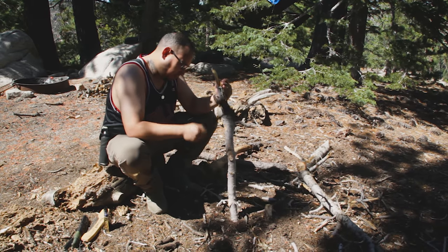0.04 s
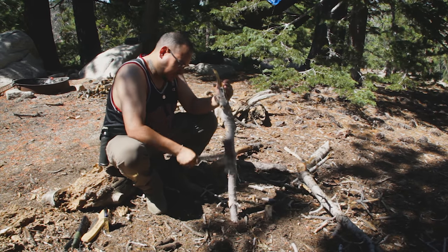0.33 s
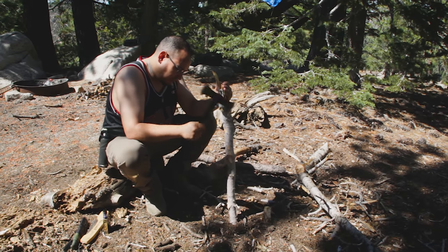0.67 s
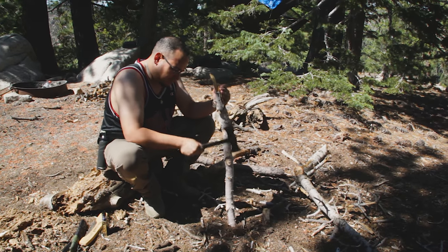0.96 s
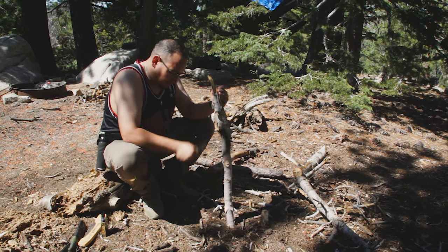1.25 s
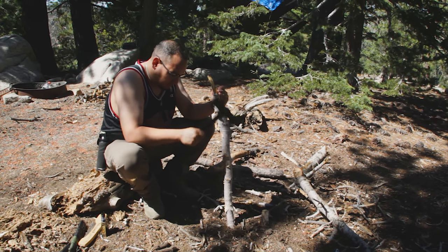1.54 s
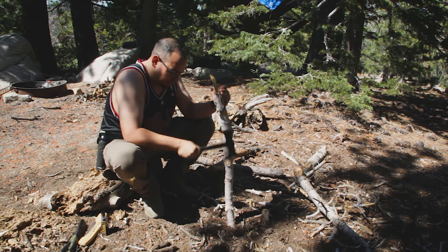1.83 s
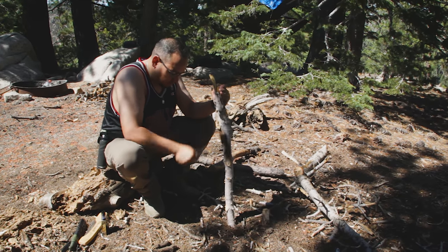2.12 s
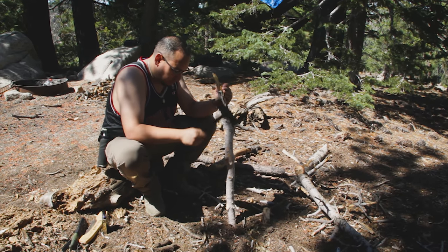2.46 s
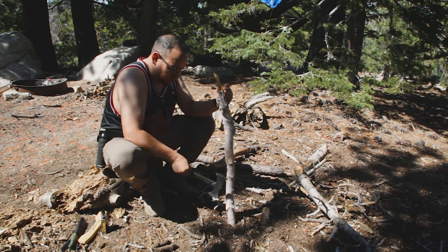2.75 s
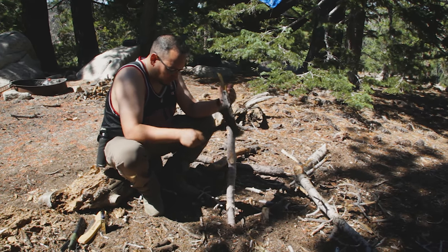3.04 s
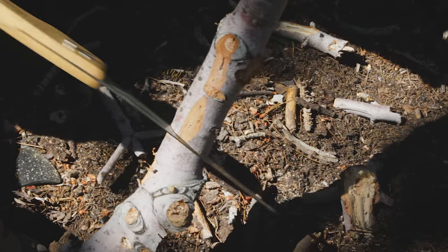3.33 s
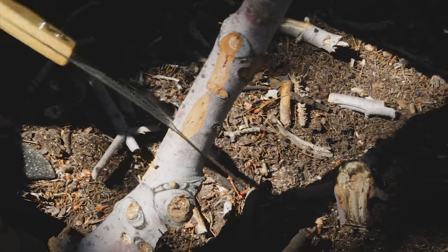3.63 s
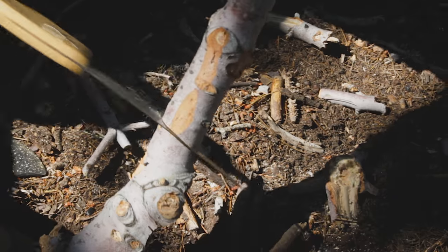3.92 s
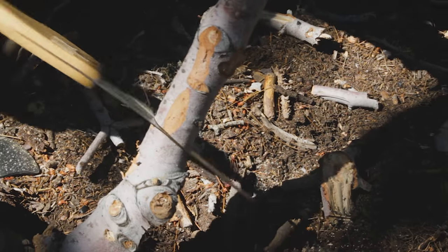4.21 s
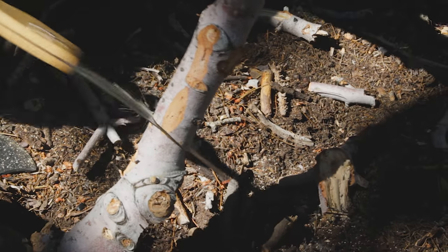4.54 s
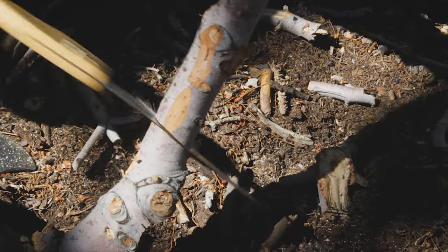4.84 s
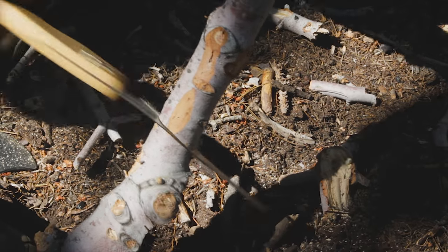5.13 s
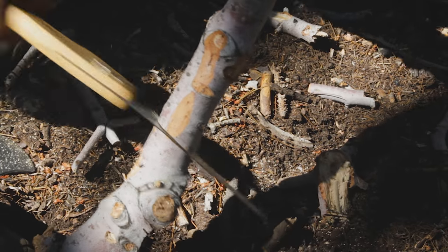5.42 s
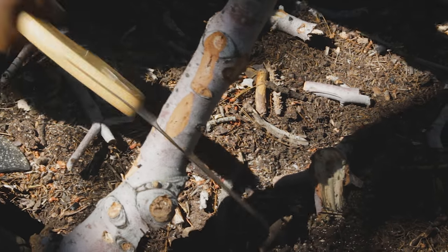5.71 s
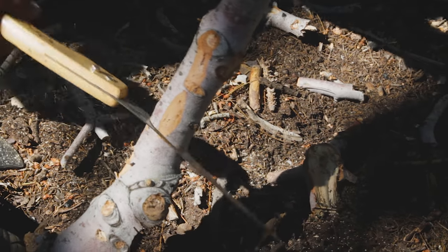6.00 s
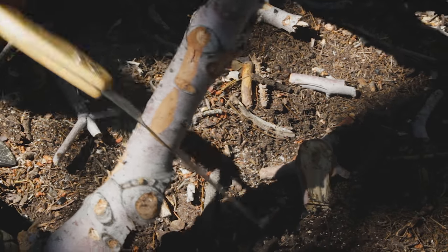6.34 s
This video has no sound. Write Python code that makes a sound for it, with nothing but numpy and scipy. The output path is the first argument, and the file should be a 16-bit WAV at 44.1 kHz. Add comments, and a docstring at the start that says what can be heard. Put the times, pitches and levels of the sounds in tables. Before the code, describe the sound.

Six evenly paced hatchet blows drive a wooden stake into the soil, each a dry knock with a light metallic ring. Right after, close up, a hand saw rasps rapidly back and forth through a branch. Its thin blade rings and squeaks when pinched, and the handle knocks the wood a few times. A faint hush of treetops lies underneath, with soft puffs of wind on the microphone during the sawing.

```python
"""A hatchet knocks six times on a wooden stake in a quiet forest: each impact excites the damped modes of
the stake and the long ring of the steel head, and the trees scatter the sound back. Then a pull saw cuts
a branch close by: its teeth tear fibres and drive the blade's resonances, louder on the pull than on the
push. Stick-slip friction makes the blade squeal, the handle bumps the branch after some pushes,
and a little air buffets the microphone."""
import sys
import numpy as np
from scipy import signal
from scipy.fft import rfft, irfft, next_fast_len
from scipy.io import wavfile
from scipy.ndimage import uniform_filter1d, map_coordinates

SR = 44100
rng = np.random.default_rng(int(sys.argv[2]) if len(sys.argv) > 2 else 0)


def to_wav(sig):
    """Store sig (one row per channel, or 1-D mono) as 16-bit WAV at the path in sys.argv[1].

    Samples outside -1..1 are clipped; the rate is SR.
    """
    pcm = np.clip(np.atleast_2d(sig), -1, 1) * 32767
    pcm = np.round(pcm).astype(np.int16)
    wavfile.write(sys.argv[1], SR, pcm.T)  # frames by channels


N = 280917
TIME = np.arange(N) / SR
AGE = TIME[:SR]  # seconds since an impact
TOP_HZ = 15400

# blows that drive the stake into the soil: start_s, level_db
SOIL_BLOWS = [(0.415, -34.5), (0.932, -30.5), (1.385, -28.5), (1.831, -38), (2.251, -31.5)]
# saw strokes: start_s, length_s, rasp_db, lean_db, ring_db, ring_place (0-1), wood_db
# lean is the change in level from start to end as the hand's pressure changes
PULL_STROKES = [(3.274, 0.062, -32.5, -17, -26.5, 0.2, -32), (3.607, .122, -23.5, 10.5, -16.5, 0.68, -27),
                (3.934, 0.15, -26.5, 0, -12.5, 0.53, -27), (4.246, 0.17, -23, -1.5, -11.5, 0.37, -25.5),
                (4.564, 0.16, -22.5, 1, -12, 0.45, -24.5), (4.873, .182, -22, -4, -12.5, 0.44, -24.5),
                (5.184, .164, -25.5, 1.5, -11, 0.45, -27), (5.489, 0.19, -21, -2.5, -11.5, 0.42, -25),
                (5.798, 0.15, -22, 2.5, -11.5, 0.45, -24.5), (6.116, 0.13, -26.5, 9.5, -16.5, 0.34, -26)]
PUSH_STROKES = [(3.385, .16, -33, 23, -23, 0.88, -33.5), (3.748, .14, -29, 17.5, -19, 0.66, -28.5),
                (4.074, .158, -30, -3, -22, 0.63, -27), (4.405, 0.12, -27.5, -6, -17, 0.67, -23),
                (4.714, 0.13, -28.5, 3.5, -19.5, 0.62, -25.5), (5.022, .125, -28.5, 5, -14.5, 0.63, -26.5),
                (5.327, .117, -32.5, 14, -20, 0.66, -29), (5.662, 0.087, -32, 2, -19.5, 0.58, -27.5),
                (5.94, 0.12, -35.5, 6, -23.5, 0.7, -31.5), (6.251, 0.12, -32.5, 6, -24, .71, -28.5)]
# the kerf pinches the blade: middle_s, half_length_s, squeal_db, slip_rate_hz, rasp_rise_db
PINCHES = [(4.692, 0.0045, -37, 560, 8), (5.003, .008, -19, 556, 11.5), (5.305, 0.015, -26, 485.8, 14.5),
           (5.609, 0.01, -20.5, 588, 11.5), (5.918, 0.0081, -9.5, 563, 11.5),
           (6.217, 0.012, -13.5, 560.5, 12)]
# spectrum of teeth skidding on the push: frequency_hz, level_db
SKID_SPECTRUM = [(2300, -33), (3300, -3), (4400, 1.5), (5000, 1), (5900, 1), (7200, -10), (8800, -4.5),
                 (11000, -7.5), (12500, -13.5), (14800, -33.5), (15800, -41.5)]
# spectrum of the scraped branch: frequency_hz, level_db
WOOD_SPECTRUM = [(50, -9), (130, -16.5), (310, 6), (420, -2.5), (600, 1.5), (760, 5.5), (1100, 1.5),
                 (1550, 8), (1800, 4.5), (2100, 8.5), (2450, 2), (3200, 5.5), (6000, -37)]


def undb(db):
    """Decibels to amplitude ratio."""
    return 10 ** (np.asarray(db) / 20)


def unit(x):
    """Normalise to rms 1."""
    return x / np.sqrt(np.mean(x ** 2))


def fade(t60):
    """Exponential decay, 60 dB in t60 seconds."""
    return np.exp(-np.log(1000) * AGE / max(t60, 1e-3))


def swell(middle_s, half_s):
    """Gaussian envelope; peak 1."""
    return np.exp(-((TIME - middle_s) / half_s) ** 2)


def linger(gain, release_s):
    """First-order lag: a level builds up and dies away exponentially."""
    keep = np.exp(-1 / (SR * max(release_s, 1e-3)))
    return signal.lfilter([1 - keep], [1, -keep], gain)


def add(out, start_s, sound):
    """Superpose a sound from a given time."""
    i = max(int(start_s * SR), 0)
    out[i:i + len(sound)] += sound[:max(N - i, 0)]


def shape(x, response):
    """Filter by a frequency response."""
    size = next_fast_len(len(x) + 4096)
    hz = np.maximum(np.arange(size // 2 + 1) * SR / size, 1)
    return irfft(rfft(x, size) * response(hz), size)[:len(x)]


def colour(x, spectrum):
    """Impose a spectral envelope of (frequency_hz, level_db) points; rms 1."""
    hz, db = np.transpose(spectrum)
    return unit(shape(x, lambda f: undb(np.interp(np.log(f), np.log(np.sort(hz)), db))))


def resonate(x, hz, width_hz):
    """Two equal resonators in cascade; rms 1."""
    return unit(shape(x, lambda f: (1 + 1j * (f / hz - hz / f) * hz / width_hz) ** -2))


def walk(rate_hz):
    """Smooth random modulation; rms 1."""
    hold = max(int(SR / rate_hz), 2)
    steps = rng.standard_normal(4096)
    return unit(uniform_filter1d(steps[np.arange(N) // hold % len(steps)], hold))


def knock(modes):
    """Impact response: a sum of damped modes of alternating sign; peak 1."""
    ring = sum((-1) ** k * undb(db) * fade(t60) * np.cos(2 * np.pi * hz * AGE)
               for k, (hz, t60, db) in enumerate(modes))
    ring = shape(ring, lambda f: (1 + 1j * f / modes[-1][0] / 2) ** -2)  # the contact acts as a low-pass
    return ring / np.abs(ring).max()


def clicks(rate_hz, spread_db):
    """Shot noise: random impulses of uneven size; rms 1."""
    hits = rng.random(N) < rate_hz / SR
    return unit(hits * rng.standard_normal(N) * undb(spread_db * rng.standard_normal(N)))


def swing(start_s, length_s):
    """Half a cycle of harmonic motion of the arm, rest to rest: progress and speed, both 0-1."""
    progress = np.clip((TIME - start_s) / length_s, 0, 1)
    return progress, np.sin(np.pi * progress) * (progress < 1)


def air(hush_db=-56.5, flutter_db=4.0, draught_db=-49):
    """Turbulence: a steady hush in the treetops, and eddies on the microphone from breeze and arm."""
    # spectra of the treetops and of the buffeting: frequency_hz, level_db
    treetops = [(15, -45), (25, -16), (56, -13), (120, -18), (200, -11.5), (276, -11), (437, -8),
                (710, -5.5), (1010, -4.5), (1980, -13), (2150, -11), (6310, -20.5), (15800, -34)]
    buffeting = [(20, -13), (60, 8.5), (100, 7.5), (200, 13), (350, -1), (700, -31), (2000, -70)]
    # slow swells of the breeze: middle_s, half_length_s, level_db
    gusts = [(4.25, 0.21, -34), (4.75, 0.21, -44), (5.83, 0.035, -45), (6.204, 0.055, -33),
             (6.353, 0.059, -33)]
    hush = colour(rng.standard_normal(N), treetops) * undb(hush_db)
    eddies = unit(colour(rng.standard_normal(N), buffeting) * undb(flutter_db * walk(35)))
    breeze = sum(undb(db) * swell(middle_s, half_s) for middle_s, half_s, db in gusts)
    arm_speed = sum(swing(start_s, length_s)[1] for start_s, length_s, *_ in PULL_STROKES + PUSH_STROKES)
    draught = undb(draught_db) * linger(arm_speed, release_s=0.05)
    return hush + eddies * np.hypot(breeze, draught)


def steel_head(facing_s=0.096, facing_spread=.55, edge_on_db=-18, waver_db=2.3, contact_db=8):
    """Free vibration of the hatchet head; directivity and Doppler shift make it waver as it swings."""
    # modes of the steel: pitch_hz, t60_s
    modes = [(1534, 1.5), (2820, 1.24), (6840, 0.19), (9010, 0.33), (10300, .14), (10680, 0.16)]
    # onsets of ringing: start_s, then level_db of each mode
    onsets = [(0.0, -74, -64, -71, -52, -82.5, -83.5), (0.406, -38, -40, -37, -28.5, -43.5, -25),
              (0.923, -70, -70.5, -50.5, -37.5, -42, -47.5), (1.374, -76, -34.5, -37, -41.5, -44, -38),
              (1.824, -70, -70, -47, -58, -44.5, -52), (2.24, -35, -47, -37, -26, -37, -39),
              (2.751, -23.5, -33, -55, -30, -57, -28)]
    out = np.zeros(N)
    # the lowest mode beams from the cheek, so it is loud only while the cheek faces the microphone
    facing = undb(edge_on_db) + np.exp(-(np.log(AGE / facing_s + 1e-9) / facing_spread) ** 2)
    contact = undb(contact_db) * fade(t60=0.069)  # fast early decay while the wood damps the steel
    for k, (hz, t60) in enumerate(modes):
        ring = np.zeros(N)
        for start_s, *levels_db in onsets:
            ring[int(start_s * SR):] = 0  # a new contact stops the old ring
            envelope = fade(t60) * (facing if k == 0 else 1 + (start_s > 0) * contact)
            doppler_time = np.cumsum(1 + .001 * walk(25)[:SR] + .0015 * walk(200)[:SR]) / SR
            add(ring, start_s, undb(levels_db[k]) * envelope * np.sin(2 * np.pi * hz * doppler_time))
        waver = walk(hz / 120) + walk(hz / 60)  # shorter waves sweep past the microphone faster
        out += ring * undb(waver_db * waver * (k > 0))
    return out


def ticks():
    """Band-limited transients: twigs, grit and the snagging blade give short snaps of noise."""
    # snaps: start_s, level_db, t60_s, centre_hz, width_hz
    snaps = [(0.128, -56, .05, 8900, 5000), (0.155, -58, .03, 11000, 3970),
             (0.572, -49.5, 0.13, 9700, 5000), (0.680, -45.5, 0.033, 7500, 5140),
             (3.1312, -37.5, 0.018, 4230, 4020), (3.1557, -55, 0.038, 9800, 5940),
             (3.598, -38, 0.096, 3470, 4000), (3.9285, -27, 0.032, 5300, 6850),
             (4.4268, -18, 0.075, 4250, 4800), (4.585, -23.5, 0.05, 3510, 4000),
             (5.17, -12.5, 0.008, 3150, 6160), (5.948, -19, 0.061, 3680, 2500),
             (6.0439, -10.5, 0.016, 2950, 6200), (6.041, -14.5, 0.029, 1980, 200),
             (6.127, -24, 0.019, 3180, 3000)]
    out = np.zeros(N)
    for start_s, db, t60, hz, width_hz in snaps:
        add(out, start_s, undb(db) * fade(t60) * resonate(rng.standard_normal(SR), hz, width_hz))
    return out


def stake(body_db=5, main_hz=900):
    """Impact excitation: a contact cracks fibres and rings the stake at a pitch set by its angle."""
    # hatchet on stake: start_s, knock_db, pitch_hz, crack_db, crack_t60_s, crack_low_hz, crack_high_hz
    contacts = [(0.402, -6.5, 922, 0.5, 0.0049, 1000, 12000), (0.4055, -20, 850, -0.5, 0.017, 2000, 12000),
                (0.4629, -29, 900, -30, 0.043, 200, 11100), (0.9231, -7.5, 902, 1.5, 0.014, 3240, 6000),
                (1.3700, -9.5, 864, -13, 0.014, 1500, 10870), (1.3766, -12.5, 900, -3.5, 0.024, 1210, 7540),
                (1.8211, -5.5, 845, -4, 0.02, 2200, 4870), (1.823, -30, 880, -3, 0.015, 2580, 7440),
                (2.2356, -12, 839, -16, 0.014, 598, 3000), (2.241, -13, 935, -6, 0.028, 1300, 6750),
                (2.2935, -42.5, 900, -31.5, 0.025, 1200, 3480), (2.7514, -7, 905, -7.5, 0.02, 595, 4850),
                (2.7672, -19.5, 900, -15, 0.033, 900, 2480), (2.7727, -13, 900, -10.5, 0.041, 900, 2350)]
    # modes of the stake, the strongest at main_hz: pitch_hz, t60_s, level_db
    modes = [(194, 0.053, -21.5), (290, 0.034, -11.5), (437, 0.017, -6), (772, 0.009, 3.5),
             (900, 0.018, 5.5), (1084, 0.024, -6), (1590, .016, -22), (2170, 0.027, -9.5),
             (2860, 0.027, -10)]
    # spectrum of cracking fibres: frequency_hz, level_db
    crack_spectrum = [(200, -29.5), (1200, 3.5), (2400, 5.5), (3300, 0.5), (5400, -3.5), (6200, -2.5),
                      (6850, 9.5), (7600, -1.5), (9500, -4), (10600, 0), (12000, -13.5), (16000, -11)]
    out = np.zeros(N)
    for start_s, knock_db, pitch_hz, crack_db, crack_t60, low_hz, high_hz in contacts:
        body = knock([(hz * pitch_hz / main_hz, t60, db) for hz, t60, db in modes])
        crack = colour(rng.standard_normal(SR), crack_spectrum)
        # each contact's crack has its own band, from low_hz to high_hz
        crack = unit(shape(crack, lambda f: 1 / np.sqrt(1 + (f / high_hz) ** 4 + (low_hz / f) ** 4)))
        add(out, start_s, undb(body_db + knock_db) * body + undb(crack_db) * fade(crack_t60) * crack)
    return out


def trees(x, wet_db, build_s=0.023, t60=0.31, early_db=-17, early_t60=0.14):
    """Scattering from trunks: a diffuse cloud of echoes with a faint, faster-decaying part."""
    # spectrum of the echoes: frequency_hz, level_db
    echo_spectrum = [(80, -6), (400, -5.5), (900, -6), (2800, -1), (5500, -5.5), (8000, -31.5), (15000, 2)]
    cloud = colour(rng.standard_normal(SR), echo_spectrum) * (fade(t60) + undb(early_db) * fade(early_t60))
    cloud *= np.minimum(AGE / build_s, 1) ** 2
    return undb(wet_db) * signal.fftconvolve(x, cloud / np.sqrt(np.sum(cloud ** 2)))[:N]


def soil_thuds(attack_s=.004):
    """Heavily damped vibration of the soil as the stake is driven in."""
    # modes of the soil around the foot: pitch_hz, t60_s, level_db
    modes = [(81.2, 0.04, 0.5), (150, 0.018, 10), (213, 0.098, -3)]
    out, body = np.zeros(N), knock(modes)
    for start_s, db in SOIL_BLOWS:
        add(out, start_s, undb(db) * body * np.minimum(AGE / attack_s, 1))
    return out


def crumbs(sawdust_db=-52, sawing_from_s=3.35, sawing_to_s=6.37, bark_db=-41, bark_t60=0.12):
    """Shot noise of tiny impacts: bark scatters after each thud, and sawdust patters under the saw."""
    amount = undb(sawdust_db) * ((TIME > sawing_from_s) & (TIME < sawing_to_s))
    for start_s, _ in SOIL_BLOWS:
        add(amount, start_s, undb(bark_db) * fade(bark_t60))
    return amount * colour(clicks(rate_hz=900, spread_db=4), SKID_SPECTRUM)


def handle_bumps(body_db=3, scuff_db=-17, scuff_t60=0.037):
    """Impact and friction: the saw's handle excites the modes of the branch and scuffs its bark."""
    # handle on branch: start_s, level_db
    bumps = [(3.13, -38), (3.5265, -6.5), (3.8709, -5), (4.83, -12.5), (6.043, -32)]
    # modes of the branch: pitch_hz, t60_s, level_db
    modes = [(216, 0.065, -16), (429, 0.033, -9.5), (621, 0.028, 4), (746, 0.018, 6.5), (1166, 0.014, 3),
             (1650, 0.0077, 6.5)]
    out, body = np.zeros(N), knock(modes)
    for start_s, db in bumps:
        scuff = colour(rng.standard_normal(SR), WOOD_SPECTRUM) * fade(scuff_t60)
        add(out, start_s, undb(db) * (undb(body_db) * body + undb(scuff_db) * scuff))
    return out


def pings(rate_hz, t60, spread_db, samples=400):
    """Free vibration of single teeth and splinters, each flicked into a brief ring at its own pitch."""
    out, age = np.zeros(N), AGE[:samples]
    start, pitch, size, phase = rng.random((int(rate_hz * N / SR), 4)).T[:, :, None]
    envelopes = undb(-spread_db * np.log(1 - .95 * size)) * fade(t60)[:samples]
    grains = envelopes * np.sin(2 * np.pi * (pitch * TOP_HZ * age + phase))
    np.add.at(out, (start * (N - samples)).astype(int) + np.arange(samples), grains)
    return unit(out)


def drive(strokes, rasp_power, wood_power, wood_lean_db, ring_width, off_ring_db):
    """Power laws of stroke speed set the gains of rasp, blade and wood; returned with the progress."""
    rasp, blade, wood, place = np.zeros((4, N))
    pinch_db = sum(rise_db * swell(middle_s, half_s=0.011) for middle_s, *_, rise_db in PINCHES)
    # just after a pinch the teeth skid, and the branch shakes less
    skid_db = -7.5 * sum(swell(middle_s + 0.021, half_s=0.019) for middle_s, *_ in PINCHES)
    for start_s, length_s, rasp_db, lean_db, ring_db, ring_place, wood_db in strokes:
        progress, speed = swing(start_s, length_s)
        on = speed > 0
        place[on], speed, along = progress[on], speed[on], progress[on] - .5
        # the blade rings most at one place along its length
        off_ring = 1 - np.exp(-((place[on] - ring_place) / ring_width) ** 2)
        rasp[on] = speed ** rasp_power * undb(rasp_db + lean_db * along + pinch_db[on])
        blade[on] = speed ** rasp_power * undb(ring_db + off_ring_db * off_ring + 0.27 * pinch_db[on])
        wood[on] = speed ** wood_power * undb(wood_db + (lean_db + wood_lean_db) * along + skid_db[on])
    shake = undb(-17.5) * linger(wood, release_s=0.087)  # the branch shakes on after a stroke
    return rasp, blade, np.hypot(wood, shake), place


def saw(motion, rasp_spectrum, rasp_db, blade_db, wood_db, chatter_db, chatter_hz, glide, tooth_hz):
    """Forced vibration: teeth snapping fibres hiss, ring the thin blade and shake the branch."""
    # resonances of the blade: centre_hz, width_hz, level_db
    resonances = [(2825, 185, 1.5), (3000, 188, 9.5), (3140, 93, -32)]
    rasp_gain, blade_gain, wood_gain, progress = motion
    travel, speed = -np.cos(np.pi * progress), np.sin(np.pi * progress)
    # the blade sticks and slips in the kerf, so the teeth catch in bunches
    chatter = undb(chatter_db * walk(chatter_hz))
    teeth = clicks(rate_hz=4000, spread_db=-0.5) * chatter
    grit = teeth + pings(rate_hz=2400, t60=.025, spread_db=2.5) * chatter
    blade = unit(sum(undb(db) * resonate(np.roll(teeth, 40 * k), hz, width_hz)
                     for k, (hz, width_hz, db) in enumerate(resonances)))
    # the free length of the blade changes along the stroke, and its pitch with it
    pitch_ratio = 1 + glide * travel + .012 * walk(40)
    blade = map_coordinates(blade, [np.cumsum(pitch_ratio)], order=3, mode="mirror")
    # evenly spaced teeth bump over the edge of the kerf: a buzz whose pitch follows the speed
    teeth_passed = np.floor(np.cumsum(tooth_hz * speed * (1 + .06 * walk(600))) / SR)
    buzz = unit(np.diff(teeth_passed, prepend=0) * chatter)
    buzz -= uniform_filter1d(buzz, size=200)
    wood = colour(grit + teeth, WOOD_SPECTRUM) + .3 * colour(buzz, WOOD_SPECTRUM)
    return (undb(rasp_db) * rasp_gain * colour(grit, rasp_spectrum)
            + undb(blade_db) * blade_gain * blade
            + undb(wood_db) * wood_gain * wood)


def branch_groans(jitter=.035, octave_db=-6):
    """Contact chatter: the branch bounces on the teeth at an unsteady rate, giving a short low tone."""
    # judders: middle_s, half_length_s, level_db, rate_hz
    judders = [(3.496, 0.012, -30.5, 290), (4.023, 0.015, -38, 320), (4.786, 0.027, -29, 208),
               (5.089, 0.027, -40.5, 210), (5.722, 0.016, -31.5, 222), (5.9, 0.009, -31.5, 330),
               (6.347, .012, -24.5, 305)]
    out, wobble = np.zeros(N), 1 + jitter * walk(150)
    for middle_s, half_s, db, hz in judders:
        phase = 2 * np.pi * hz * np.cumsum(wobble) / SR
        out += undb(db) * swell(middle_s, half_s) * (np.sin(phase) + undb(octave_db) * np.sin(2 * phase))
    return out


def air_puffs(half_s=0.0063, lead_s=.05):
    """Pressure fluctuation: a brief eddy gives the microphone a cycle or two of low frequency."""
    # single eddies: middle_s, level_db, centre_hz
    eddies = [(4.099, -30, 109), (4.274, -29, 120.7), (4.591, -28, 97), (4.711, -33, 169),
              (4.866, -29.5, 105), (5.246, -30, 104), (5.385, -26, 109.7), (5.405, -28, 90),
              (5.72, -43, 150)]
    out, centred = np.zeros(N), AGE - lead_s
    envelope = np.exp(-(centred / half_s) ** 2)
    for middle_s, db, hz in eddies:
        add(out, middle_s - lead_s, undb(db) * envelope * np.sin(2 * np.pi * hz * centred))
    return out


def blade_squeals(jitter=0.051, slowing=.05):
    """Stick-slip oscillation: where the kerf pinches the blade, the slips lock into a falling buzz."""
    # spectrum of the squeal: frequency_hz, level_db
    squeal_spectrum = [(500, -50), (2200, 4), (2800, 21.5), (3800, 15.5), (5000, 5), (6000, 0), (7500, -40),
                       (14000, -42)]
    out = np.zeros(N)
    for middle_s, half_s, db, hz, _ in PINCHES:
        offset = np.clip(AGE / half_s - 3, -3, 3)  # half lengths from the middle
        cycles = np.cumsum(hz * (1 - slowing * offset + jitter * walk(900)[:SR])) / SR
        slips = colour(np.diff(np.floor(cycles), prepend=0), squeal_spectrum)
        add(out, middle_s - 3 * half_s, undb(db) * np.exp(-offset ** 2) * slips)
    return out


def blade_twang():
    """Elastic recoil: a short note rises as the bent blade springs straight after the last pinch."""
    # recoil: middle_s, half_length_s, level_db, final_pitch_hz, settle_s
    recoils = [(6.232, .016, -29.5, 789.5, 0.01387)]
    out = np.zeros(N)
    for middle_s, half_s, db, hz, settle_s in recoils:
        age = np.maximum(TIME - middle_s + 2 * half_s, 0)
        pitch_hz = hz * (1 - np.exp(-age / settle_s))
        out += undb(db) * swell(middle_s, half_s) * np.sin(2 * np.pi * np.cumsum(pitch_hz) / SR)
    return out


def scene():
    """Superposition: hatchet, then saw, both echoed by the trees, over falling crumbs and moving air."""
    # spectrum of teeth tearing fibres on the pull: frequency_hz, level_db
    tear_spectrum = [(2300, -21.5), (3300, -11), (3800, 5), (4400, 0), (4950, 1.5), (5900, 1), (6500, -5),
                     (6900, -3), (7300, -10.5), (8800, -3.5), (10500, -8.5), (12500, -12.5), (14800, -30),
                     (15800, -39)]
    hatchet = stake() + soil_thuds() + steel_head()
    pulling = drive(PULL_STROKES, rasp_power=1.28, wood_power=1.06, wood_lean_db=4.0,
                    ring_width=0.14, off_ring_db=-9.5)
    pushing = drive(PUSH_STROKES, rasp_power=1.0, wood_power=0.68, wood_lean_db=6,
                    ring_width=0.19, off_ring_db=-16.5)
    pulls = saw(pulling, tear_spectrum, rasp_db=-0.9, blade_db=0.06, wood_db=-1.74,
                chatter_db=1.8, chatter_hz=200, glide=-0.0296, tooth_hz=731.0)
    pushes = saw(pushing, SKID_SPECTRUM, rasp_db=0.07, blade_db=1.1, wood_db=-1.9,
                 chatter_db=1.04, chatter_hz=190, glide=0.0387, tooth_hz=654)
    close = pulls + pushes + blade_squeals() + branch_groans() + blade_twang() + handle_bumps() + ticks()
    echoes = trees(hatchet, wet_db=-24) + trees(close, wet_db=-22.5)
    return (hatchet + close + echoes + crumbs() + air() + air_puffs())[None]


def record(dry):
    """Overload and band limiting: the hardest blows clip, and a steep low-pass cuts the top."""
    low_pass = signal.ellip(10, .2, 80, TOP_HZ, fs=SR, output="sos")
    return signal.sosfilt(low_pass, np.clip(dry, -1, 1))


dry = scene()
out = record(dry)
to_wav(out)
```